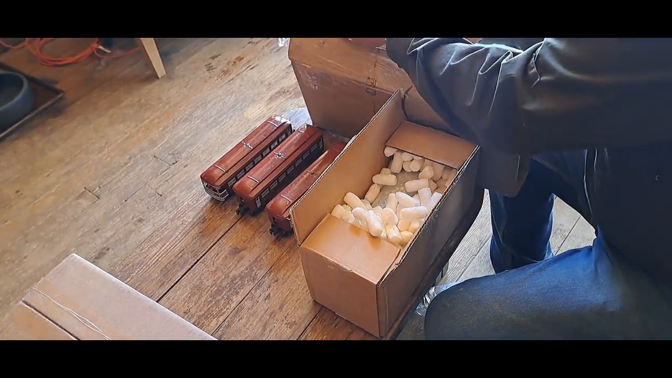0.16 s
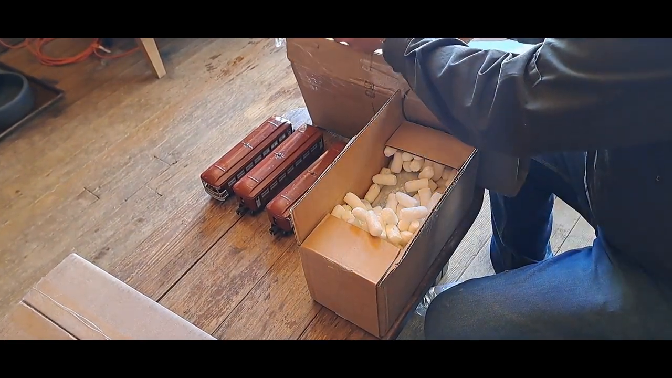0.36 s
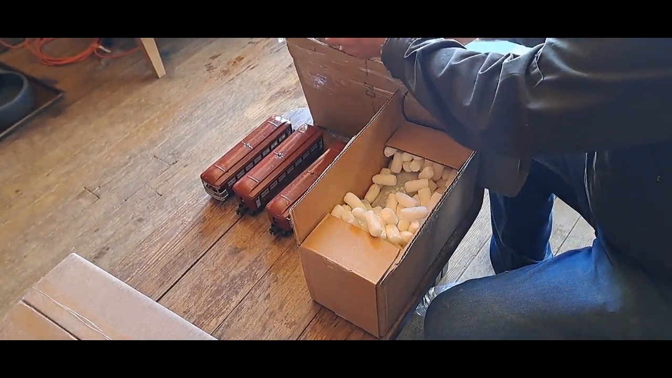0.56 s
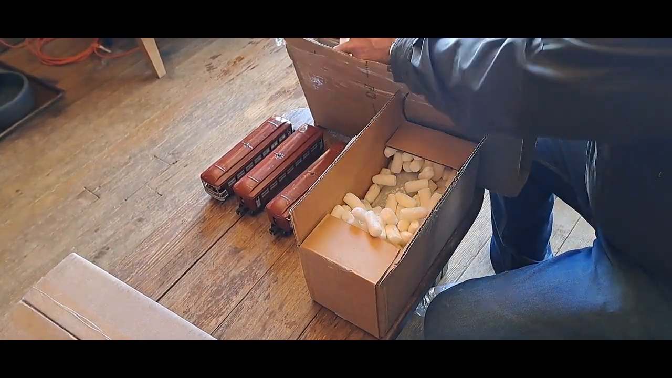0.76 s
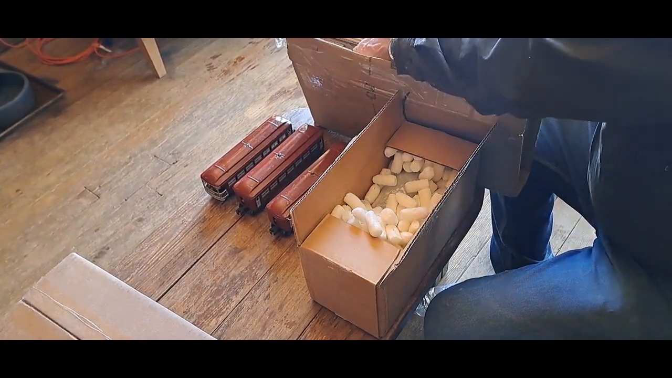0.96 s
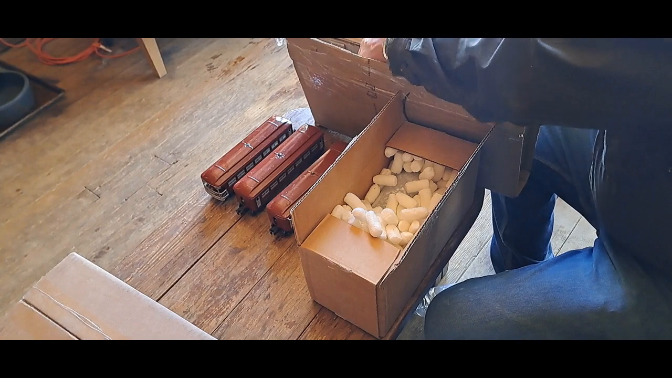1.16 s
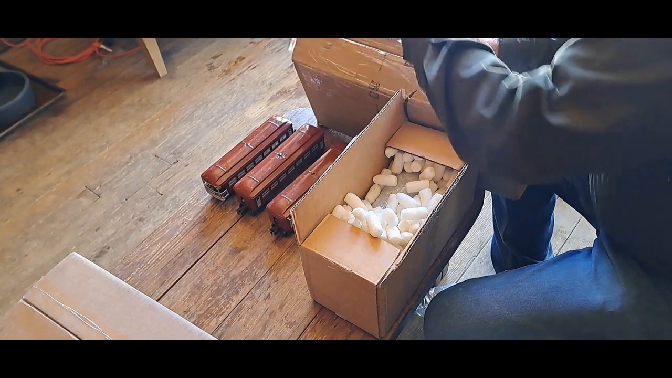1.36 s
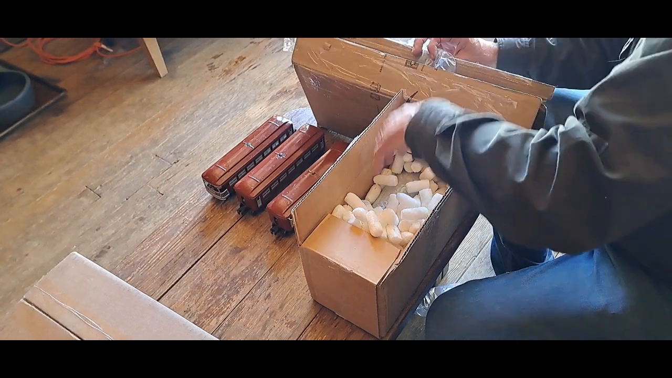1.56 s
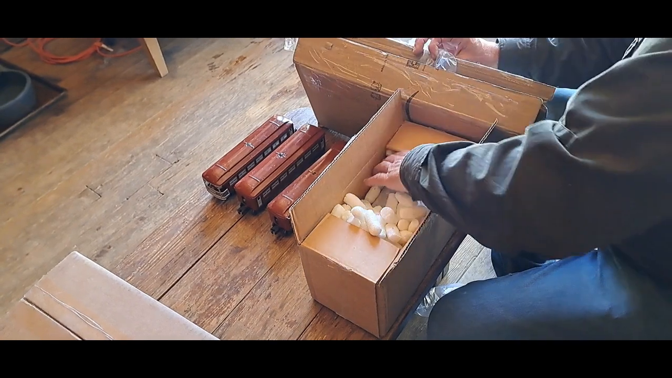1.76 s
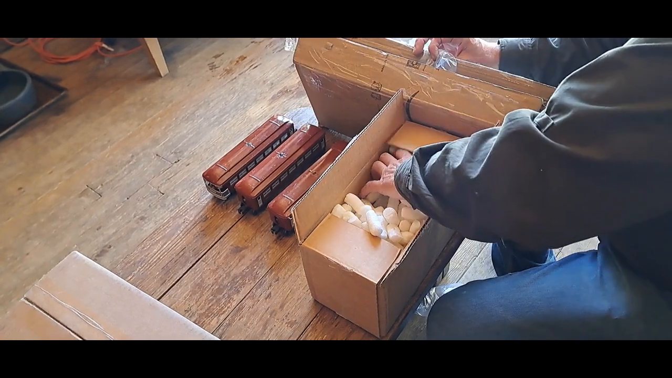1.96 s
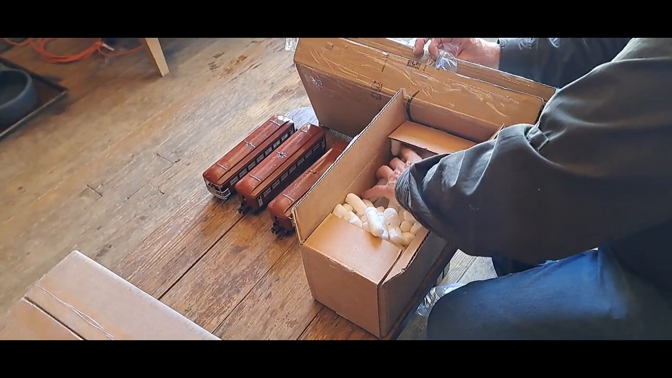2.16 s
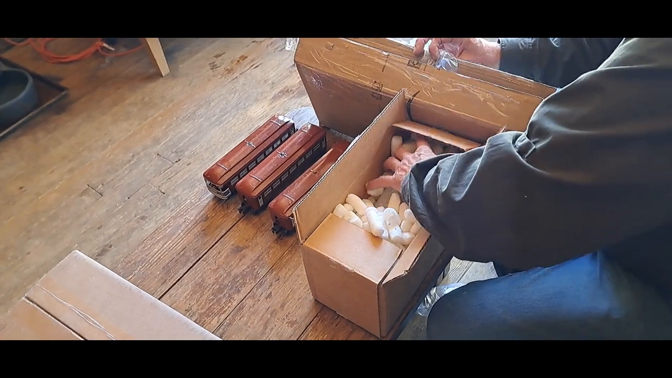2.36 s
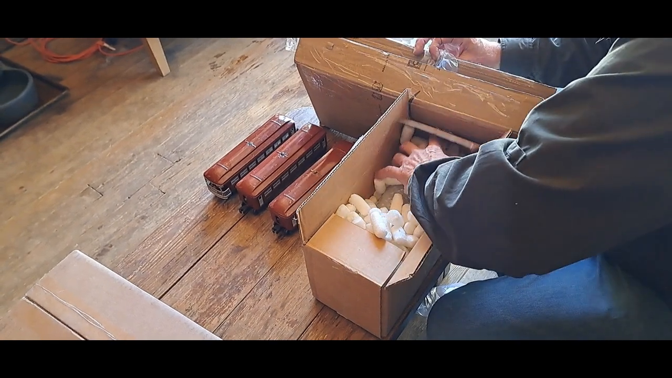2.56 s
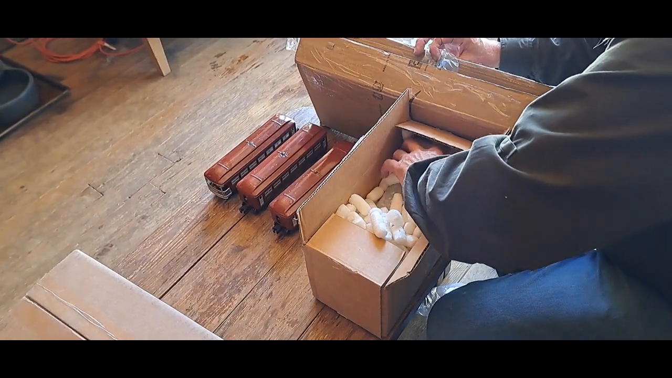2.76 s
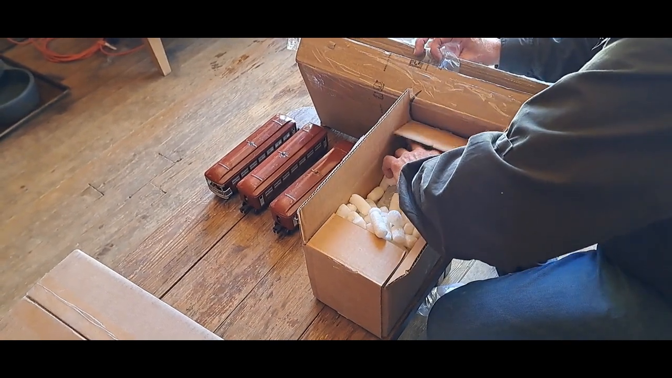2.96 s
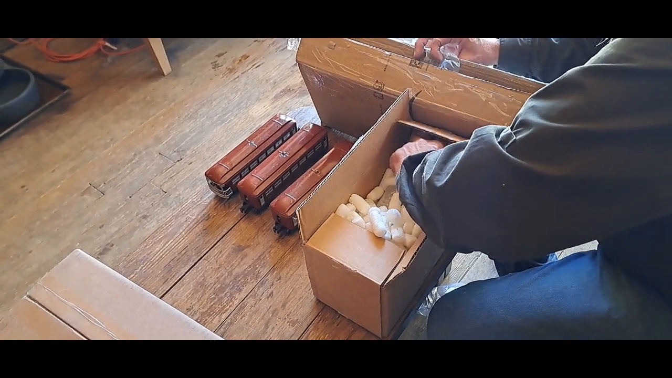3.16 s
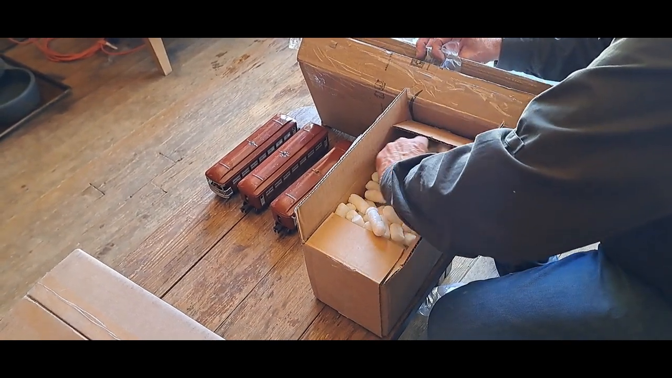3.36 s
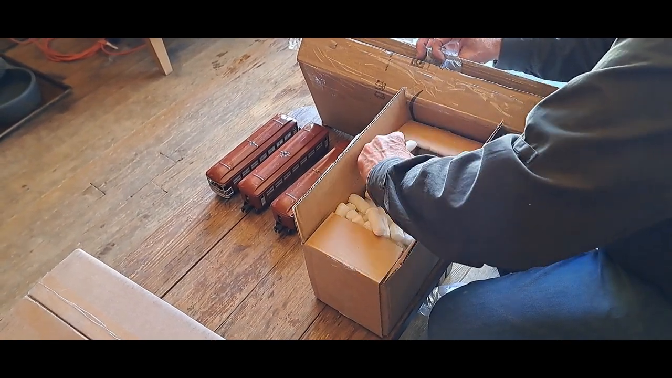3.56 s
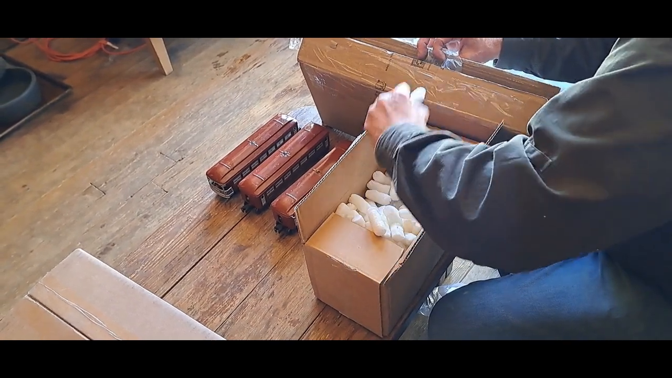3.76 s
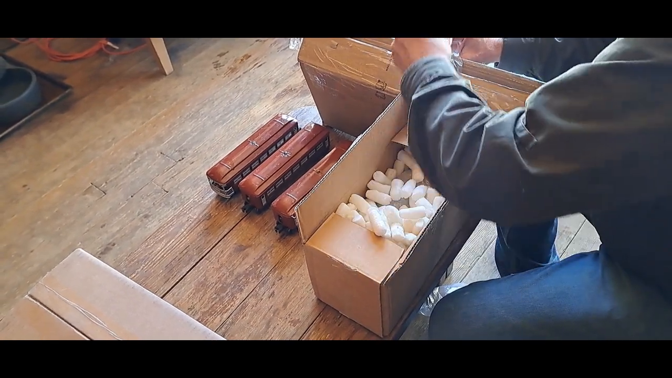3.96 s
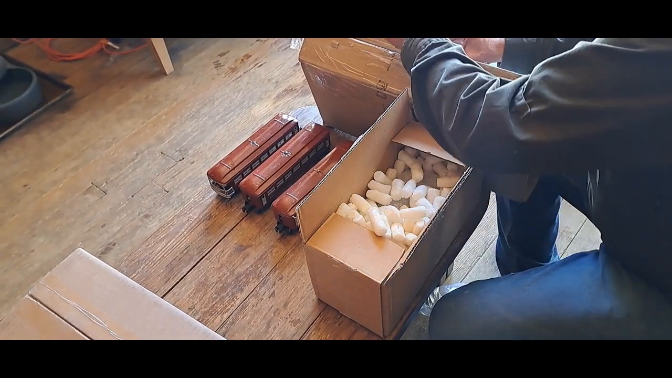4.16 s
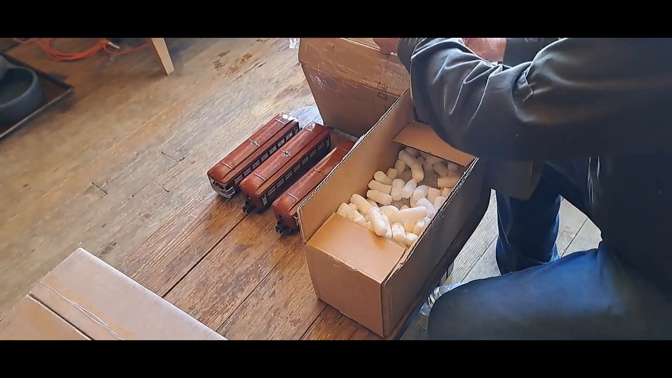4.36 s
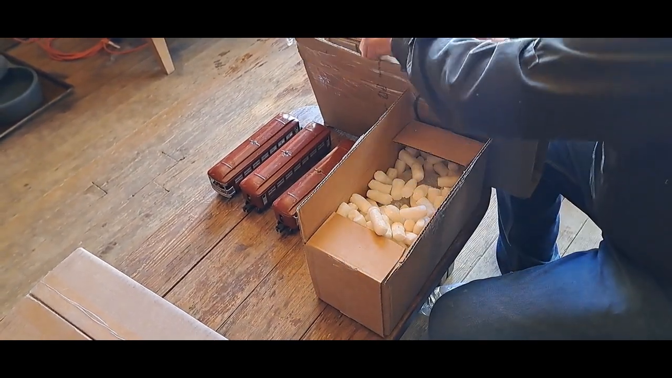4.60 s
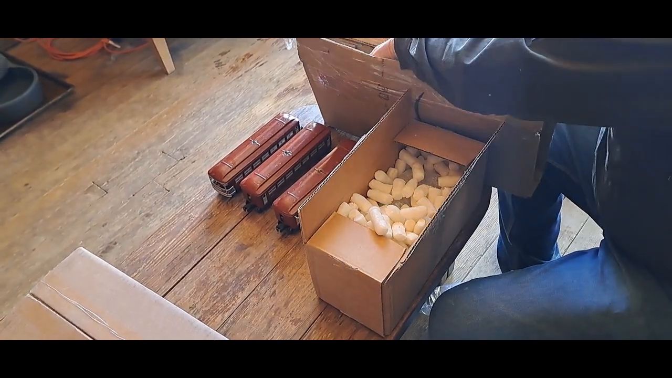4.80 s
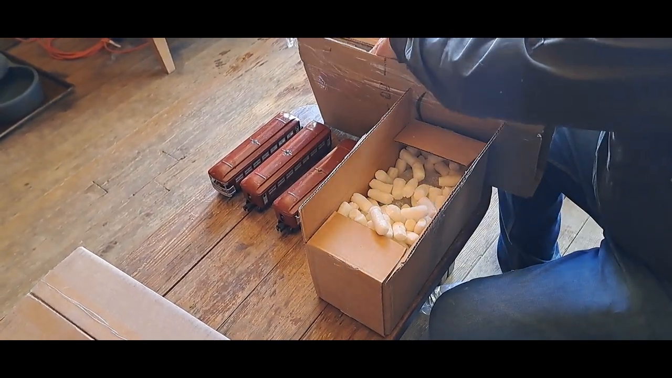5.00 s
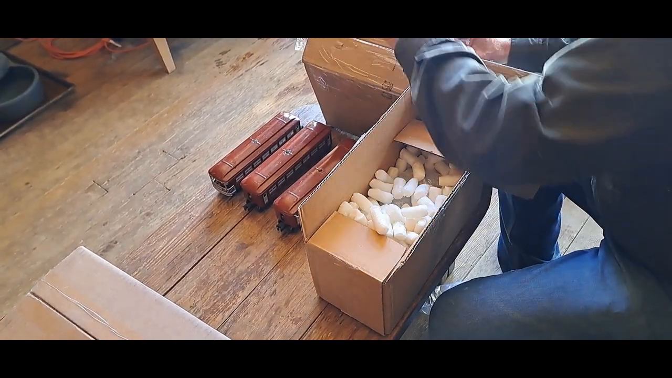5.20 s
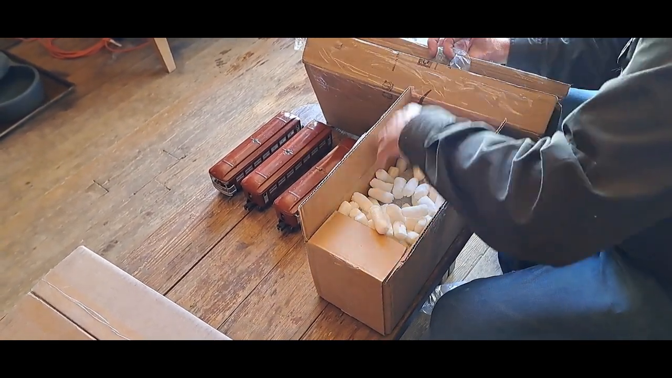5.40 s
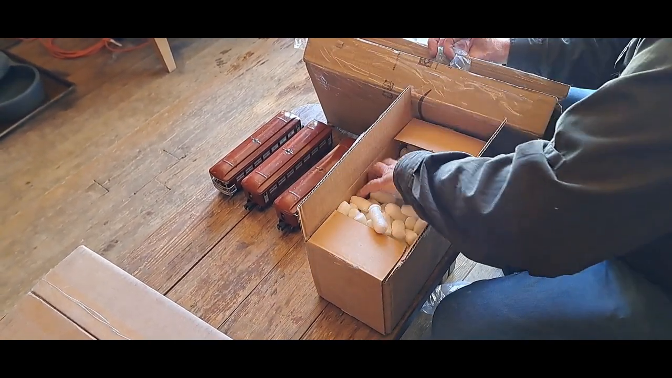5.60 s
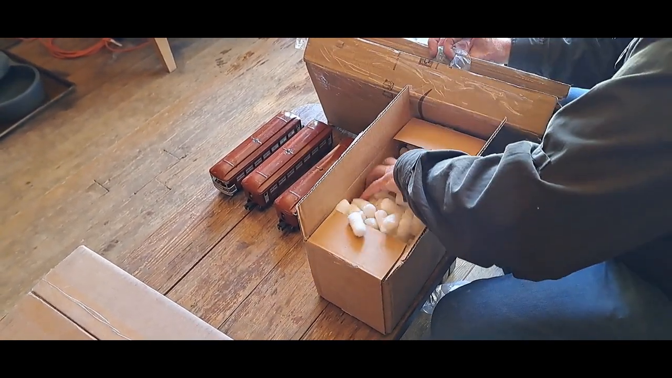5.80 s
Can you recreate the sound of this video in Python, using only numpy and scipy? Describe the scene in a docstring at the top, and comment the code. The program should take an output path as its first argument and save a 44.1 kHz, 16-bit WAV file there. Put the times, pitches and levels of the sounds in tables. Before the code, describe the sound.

In a small quiet room, someone searches a cardboard box full of foam peanuts, heard from nearby. Short dry rustles and a few sharp cracks lead into a longer spell of stirring and crunching, with hands knocking dully on the box. After a brief lull, more handfuls shift and tumble, and the cardboard takes a few more hollow bumps.

```python
"""Digging through foam packing peanuts

Hands stir loose foam peanuts in cardboard boxes on a wooden floor. Friction between the peanuts hisses,
their cells buckle with a crunch or a snap, and their impacts excite the low modes of the box walls.
Hands bump the boxes, the cardboard cracks, and pushes drive a thump from the floor.
A small room adds its reverberation and a faint steady tone of its own."""
import sys
import numpy as np
from scipy import signal
from scipy.fft import rfft, irfft, next_fast_len
from scipy.io import wavfile

SR = 44100
rng = np.random.default_rng(int(sys.argv[2]) if len(sys.argv) > 2 else 0)


def master_out(mix):
    """Clip the mix to full scale and print it as 16-bit PCM to the path in sys.argv[1]."""
    frames = np.transpose(np.atleast_2d(mix))
    ceiling = np.clip(frames, -1, 1)
    pcm = np.round(ceiling * 32767).astype(np.int16)
    wavfile.write(sys.argv[1], SR, pcm)


N = 257544

# hand strokes: (peak time [s], rise [s], fall [s], hiss [dB], hiss brightness [dB], crunch [dB],
# patter [dB])
HAND_STROKES = [(0.03, 0.22, 0.28, -76, 10, -69, -56), (0.115, 0.021, 0.087, -48, -2, -43.5, -44.5),
                (0.19, 0.12, 0.13, -71.5, 3, -65.5, -64.5), (0.40, 0.18, 0.2, -69.5, 4, -67, -74),
                (0.51, .1, 0.14, -88, 1, -76, -66), (0.60, 0.1, .1, -57.5, 0, -64, -66),
                (0.67, 0.18, 0.13, -64, -2, -63, -55), (0.74, .08, .1, -64.5, 4, -69, -77),
                (0.804, 0.12, 0.11, -60, 8, -62, -58.5), (0.87, .1, 0.093, -67.5, -3, -67, -79),
                (0.974, .12, 0.29, -55.5, -3.5, -60, -60), (1.02, 0.055, 0.054, -71, -7, -65, -51),
                (1.055, 0.0033, 0.11, -41.5, 3, -43.5, -49), (1.14, 0.13, 0.13, -61, -10, -47, -44.5),
                (1.236, 0.077, 0.054, -65, -9, -68, -42.5), (1.32, 0.14, 0.14, -61.5, 12, -60, -58),
                (1.366, 0.05, 0.08, -59.5, 6, -61, -43.5), (1.41, 0.053, 0.14, -66.5, -10, -60, -60),
                (1.49, .1, .12, -64.5, -10, -68, -63), (1.6, 0.18, 0.33, -80, 4, -69.5, -80),
                (1.755, 0.021, 0.23, -57.5, 2, -50.5, -58), (1.82, 0.052, 0.22, -53, -5, -66, -43.5),
                (1.875, 0.052, 0.084, -45, 0.5, -41, -49), (1.925, .06, .1, -48.5, -4, -61, -44),
                (1.98, .1, 0.1, -48, -3, -55, -45), (2.088, 0.058, 0.16, -48.5, -8.5, -47.5, -42.5),
                (2.15, 0.031, .1, -58, 1, -62, -61), (2.201, 0.023, 0.1, -49, -5.5, -54, -53),
                (2.315, 0.071, 0.13, -56.5, 2, -58.5, -45), (2.401, 0.085, 0.1, -49.5, -1, -52.5, -56),
                (2.47, 0.021, 0.18, -53, 0, -57.5, -51), (2.53, 0.039, 0.11, -53, 3.5, -69, -63),
                (2.58, 0.13, 0.07, -49, 2, -54, -46.5), (2.695, 0.19, 0.15, -53.5, -2, -60, -47),
                (2.77, 0.2, 0.11, -56, -6, -58, -49), (2.85, .1, .1, -53.5, -7.5, -54, -56),
                (2.94, 0.17, 0.17, -55.5, -1.5, -53, -55), (3.004, 0.036, 0.099, -63, -13, -49.5, -50),
                (3.14, 0.61, 0.34, -55.5, -5.5, -58.5, -53.5), (3.22, .2, 0.42, -57, -3, -55.5, -63),
                (3.29, 0.11, 0.11, -53.5, -7, -53, -68), (3.35, 0.062, 0.18, -51, -2.5, -52, -53.5),
                (3.44, .1, 0.064, -61, -9, -67, -52), (3.59, .15, 0.11, -58.5, -3.5, -70, -59),
                (3.66, 0.1, 0.089, -73, 9, -72, -61), (3.80, 0.088, 0.15, -66.5, -2, -103, -99),
                (4.07, 0.16, 0.29, -77.5, -2, -69, -89), (4.2, 0.27, .2, -68.5, -10, -85, -94),
                (4.295, 0.11, 0.14, -64, -8, -80, -95), (4.4, 0.17, .15, -72.5, -10, -68, -81),
                (4.52, 0.16, 0.13, -65, -2.5, -62.5, -63.5), (4.64, 0.14, .1, -70, 1, -80, -86),
                (4.73, 0.13, 0.27, -65.5, 5, -66, -78), (4.78, 0.07, 0.13, -53.5, -7, -64.5, -65.5),
                (4.829, 0.04, 0.097, -50, -1, -57.5, -48), (4.9, 0.11, .1, -64, 9.5, -64, -46.5),
                (4.976, .12, 0.13, -53, 4, -47.5, -45.5), (5.11, 0.055, .1, -63, 2, -71, -70),
                (5.203, .1, 0.088, -58.5, 8.5, -56, -46), (5.27, 0.087, 0.16, -72, -5, -65.5, -60),
                (5.43, 0.14, 0.11, -83, -5, -78, -63.5), (5.558, 0.013, 0.3, -63.5, 0, -53.5, -45.5),
                (5.647, 0.055, .2, -50, 3, -51.5, -46.5), (5.70, .06, 0.21, -62, -10, -58.5, -62),
                (5.76, 0.12, .2, -56, -6, -69, -53.5)]
# foam sliding on foam: (frequency [Hz], relative spectral density [dB])
HISS_SPECTRUM = [(2180, -12), (3700, -3.5), (4830, -2), (5110, -6), (6870, -8), (7860, -4.5), (9090, -12.5),
                 (10400, -9), (12100, -3), (15100, -11), (15800, -12)]
# hollow foam favours two bands: (frequency [Hz], relative spectral density [dB])
CRUNCH_SPECTRUM = [(410, -14), (700, 2), (950, -1), (1120, -0.5), (1300, -5), (1550, -5.5), (1850, -8),
                   (2130, -4.5), (2400, -5.5), (2750, -5.5), (3500, -14), (5000, -13.5), (6500, -16),
                   (11000, -79)]
# modes of the box walls and the air inside: (frequency [Hz], level [dB], t60 [s])
BOX_MODES = [(135, -32, 0.049), (181.7, -2, 0.089), (225.7, 3.5, 0.096), (281.4, -4, 0.093),
             (356.7, 1.5, 0.079), (426, 0.5, 0.03), (558, 0.5, 0.036), (630, -2, 0.049), (759, -6, 0.069),
             (931, -8.5, 0.028), (1160, -2, 0.011)]
# foam giving way: (time [s], level [dB], pitch [Hz], treble level [dB], t60 [s])
FOAM_SNAPS = [(0.025, -50, 1090, -62, 0.14), (0.1115, -25, 1280, -47, 0.037), (0.572, -59, 2030, -52, 0.17),
              (0.9921, -43, 935, -54, 0.039), (1.0513, -23, 2030, -46, 0.021), (1.075, -48, 620, -60, 0.31),
              (1.136, -27, 950, -54, 0.019), (1.226, -36.5, 910, -62, 0.054),
              (1.3911, -35, 1100, -52, 0.03), (1.4705, -50, 2250, -52, 0.044),
              (1.75, -55, 1030, -56, 0.047), (1.7715, -38, 1010, -44, 0.088),
              (1.8664, -26, 2660, -37, 0.052), (1.8746, -39, 2610, -32, 0.1), (1.97, -46, 7900, -65, 0.12),
              (2.0655, -41, 1110, -40, 0.056), (2.0842, -37, 1080, -47, 0.1),
              (2.1958, -42, 5200, -44, 0.082), (2.42, -47, 644, -65, 0.28), (2.463, -62, 1110, -41, 0.06),
              (2.54, -47, 5000, -55, 0.22), (2.684, -43, 5130, -40.5, 0.11),
              (2.9973, -34, 1710, -50, 0.028), (3.55, -52, 1283, -60, 0.14),
              (3.5767, -55, 1280, -60, 0.069), (3.575, -49.5, 762, -69.5, 0.085),
              (3.6398, -56, 1390, -54, 0.082), (3.7595, -72, 2080, -73, 0.19),
              (4.9396, -39.5, 1110, -58, 0.11), (4.9712, -44, 1090, -61, 0.15),
              (5.239, -38.5, 1120, -60, 0.032), (5.5483, -51, 1150, -58, 0.041),
              (5.616, -53, 1130, -33.5, 0.047)]
# blows on the cardboard: (time [s], peak level [dB], wall pitch [Hz], t60 [s])
BOX_BUMPS = [(0.114, -37.5, 268, 0.082), (0.399, -52.5, 283, 0.065), (0.46, -46.5, 187, 0.053),
             (0.514, -50, 264, 0.052), (0.632, -42, 332, 0.1), (0.763, -53, 295, 0.047),
             (0.959, -45, 369, 0.14), (1.015, -40, 333, 0.035), (1.049, -33, 208, 0.029),
             (1.118, -37, 354, 0.047), (1.135, -31, 353, 0.058), (1.221, -39, 293, 0.092),
             (1.229, -55.5, 237, 0.094), (1.35, -30, 192, 0.064), (1.365, -30, 232, 0.022),
             (1.475, -42, 253, 0.053), (1.496, -44, 322, 0.036), (1.538, -53.5, 298, 0.047),
             (1.752, -42, 222, 0.14), (1.864, -41, 204, 0.073), (2.078, -50, 234, 0.14),
             (2.312, -30.5, 239, 0.12), (2.57, -40.5, 230, 0.1), (2.658, -44, 175, 0.28),
             (2.827, -47, 196, 0.093), (2.884, -41, 316, 0.093), (2.95, -37.5, 246, 0.15),
             (3.002, -32.5, 186, 0.028), (3.282, -38, 248, 0.17), (3.35, -40, 224, 0.16),
             (3.688, -54, 316, 0.053), (3.951, -65, 201, 0.14), (4.068, -61, 199, 0.16),
             (4.471, -51, 307, 0.12), (4.718, -55, 227, 0.089), (4.818, -38, 342, 0.16),
             (4.934, -36.5, 600, 0.14), (5.1, -45, 330, 0.059), (5.182, -41.5, 217, 0.18),
             (5.549, -29, 327, 0.033), (5.571, -27.5, 178, 0.084), (5.597, -35, 259, 0.24),
             (5.605, -37.5, 131, 0.11), (5.745, -43, 304, 0.1)]
# dry cracks of the cardboard: (time [s], ring level [dB], pitch [Hz], tick level [dB])
CARDBOARD_CRACKS = [(0.111, -33, 1090, -47), (1.052, -24, 1900, -29), (1.751, -34, 1080, -41),
                    (1.868, -32, 2220, -33), (2.067, -29, 1080, -35), (3.001, -35, 1660, -43),
                    (5.547, -50, 826, -51)]
# pushes that reach the floor: (time [s], level [dB])
FLOOR_PUSHES = [(0.116, -59), (0.188, -59), (0.44, -59), (0.974, -49.5), (1.06, -53), (1.11, -49),
                (1.165, -43), (1.37, -53), (1.5, -66), (1.79, -54), (1.9, -49.5), (2.07, -68), (2.32, -57),
                (2.36, -55), (2.4, -61), (2.68, -62), (2.79, -69), (3.02, -58), (3.07, -67), (3.6, -51.5),
                (3.64, -64), (4.73, -67), (4.855, -41), (4.99, -58), (5.21, -68), (5.27, -64), (5.6, -52),
                (5.68, -75)]
# likeness of left and right: (frequency [Hz], coherence [0 to 1])
COHERENCE = [(60, 1), (110, 0.89), (200, 1), (380, 0.85), (700, 0.5), (1290, 0.044), (2380, 0.54),
             (4400, 0.023), (8120, 0.95), (15000, 0.74)]
# balance of the channels: (frequency [Hz], left minus right [dB])
BALANCE = [(60, -2.5), (130, 3.5), (290, 0.5), (640, -1), (1410, 0), (3100, -1.5), (6820, -1.5),
           (15000, -5.5)]
# room tone: (frequency [Hz], relative spectral density [dB])
ROOM_TONE_SPECTRUM = [(18, -53), (30, -29), (106, 7), (226, -30), (1150, -2.5), (1530, -47), (2100, 7),
                      (3540, -76), (4370, -2.5), (12200, -2.5), (15800, -37)]

HISS_SPLIT_HZ, CRUNCH_SPLIT_HZ, PATTER_SPLIT_HZ = 9530, 1756, 311
SWELL_DB, SWELL_ROUNDING = 20, 1.133   # rounding over 1: round tops, steep feet
ROOM_T60_S, EARLY_T60_S, REVERB_DB = 0.25, 0.067, -11.5


def rustle():
    """Each hand stroke drives friction, buckling and impact together; their sounds superpose."""
    times, rise, fall, hiss_peak, brightness, crunch_peak, patter_peak = np.transpose(HAND_STROKES)
    hiss_db, treble_db, crunch_db, patter_db = (
        swells(times, rise, fall, peak_db, rest_db=-95)
        for peak_db in (hiss_peak, hiss_peak + brightness, crunch_peak, patter_peak))
    crisp_db = -4 + 0.77 * (hiss_db - crunch_db)      # crisper where hiss outweighs crunch
    light_db = 1.5 + 0.44 * (crunch_db - patter_db)   # lighter where crunch outweighs patter
    return hiss(hiss_db, treble_db - hiss_db) + crunch(crunch_db, crisp_db) + patter(patter_db, light_db)


def hiss(level_db, bright_db):
    """Sliding friction: dry foam skins slip on each other, each stroke with its own brightness."""
    slips = grains(per_s=14000, uneven_db=1.6, clump_db=1.13, clump_hz=30)
    return tilt(colour(slips, HISS_SPECTRUM), HISS_SPLIT_HZ, level_db, bright_db)


def crunch(level_db, crisp_db):
    """Buckling: foam cells collapse under the fingers, each emitting an impulse."""
    collapses = grains(per_s=2500, uneven_db=0.64, clump_db=1.4, clump_hz=28)
    return tilt(colour(collapses, CRUNCH_SPECTRUM), CRUNCH_SPLIT_HZ, level_db, crisp_db)


def patter(level_db, light_db):
    """Impact excitation: peanuts tumble against the walls, each mode struck by its own share of them."""
    taps = grains(per_s=2700, uneven_db=2.58, clump_db=1.63, clump_hz=22)
    struck_mode = rng.integers(0, len(BOX_MODES), N)
    modes = sum(from_db(db) * rms_one(ring(taps * (struck_mode == k), hz, t60))
                for k, (hz, db, t60) in enumerate(BOX_MODES))
    return tilt(modes, PATTER_SPLIT_HZ, level_db, light_db)


def foam_snaps():
    """Transient resonance: a peanut gives way in decaying noise about its pitch, with a bright spray."""
    out, t = np.zeros(N + SR), np.arange(SR // 4) / SR
    for time, db, hz, treble_db, t60 in FOAM_SNAPS:
        ring_t60 = 7.6 / hz   # 7.6 cycles
        body = rms_one(ring(ring(rng.standard_normal(len(t)), hz, ring_t60), hz, ring_t60))
        spray = butterworth(rng.standard_normal(len(t)), 4500, "high", order=2)
        envelope = from_db(-60 * t / t60) * (1 - np.exp(-t / 0.0023))
        add_at(out, time, (from_db(db) * body + from_db(treble_db) * spray) * envelope)
    return out[:N]


def box_bumps():
    """Modal response: a soft blow rings the wall it hits, and most strongly the modes near that pitch."""
    out, t = np.zeros(N + SR), np.arange(SR // 4) / SR
    mode_hz, mode_db, mode_t60 = np.transpose(BOX_MODES)[:, :, None]
    attack = 1 - np.exp(-t / 0.0033)
    for time, db, wall_hz, t60 in BOX_BUMPS:
        octaves_away = np.abs(np.log2(mode_hz / wall_hz))
        excited_db = mode_db + rng.normal(0, 5.5, mode_db.shape) - 21.8 * octaves_away
        ring_t60 = t60 * mode_t60 / mode_t60.max()
        modes = from_db(excited_db - 60 * t / ring_t60) * np.sin(2 * np.pi * mode_hz * t)
        wall = from_db(3.5 - 60 * t / t60) * np.sin(2 * np.pi * wall_hz * t)
        blow = (wall + modes.sum(axis=0)) * attack
        add_at(out, time, from_db(db) * blow / np.abs(blow).max())
    return butterworth(out[:N], 113, "high", order=4)   # the blows carry little sound below about 113 Hz


def cardboard_cracks():
    """Sudden release of stress: a few cycles of free vibration under a short broadband tick."""
    out, t = np.zeros(N + SR), np.arange(SR // 20) / SR
    t60_cycles, tick_t60 = 13, 0.0063
    for time, db, hz, tick_db in CARDBOARD_CRACKS:
        knock = from_db(db - 60 * t * hz / t60_cycles) * np.sin(2 * np.pi * hz * t)
        tick = from_db(tick_db - 60 * t / tick_t60) * rng.standard_normal(len(t))
        add_at(out, time, knock + tick)
    return out[:N]


def floor_thumps():
    """Forced vibration: the floorboards answer the pushes in one low, narrow mode."""
    times, push_db = np.transpose(FLOOR_PUSHES)
    level_db = swells(times, rise=0.047, fall=0.032, peak_db=push_db, rest_db=-89.5)
    mode_hz, stage_bandwidth_hz = 62, 32
    t60 = np.log(1000) / (np.pi * stage_bandwidth_hz)
    boards = ring(ring(rng.standard_normal(N), mode_hz, t60), mode_hz, t60)
    return from_db(level_db) * rms_one(boards)


def room(direct, scattered):
    """Reverberation: reflections differ at two microphones, so coherence and balance vary with pitch."""
    t, size = np.arange(SR // 2) / SR, next_fast_len(N + SR // 2)
    decays = from_db(-60 * t / [[ROOM_T60_S], [ROOM_T60_S], [EARLY_T60_S]])
    echoes = rng.standard_normal(decays.shape) * decays
    echoes /= np.linalg.norm(echoes, axis=1, keepdims=True)
    late_mid, late_side, early = rfft(echoes, size)
    mid = rfft(direct, size) * (1 + from_db(REVERB_DB) * late_mid)
    side = rfft(scattered, size) * (early + from_db(REVERB_DB) * late_side)
    coherence = np.clip(at_bins(COHERENCE, size), 0, 1)
    mid *= np.sqrt((1 + coherence) / 2)
    side *= np.sqrt((1 - coherence) / 2)
    lean = from_db(at_bins(BALANCE, size) / 2)
    return irfft(np.array([(mid + side) * lean, (mid - side) / lean]), size)[:, :N]


def room_tone():
    """Stationary noise: the faint background of the room."""
    return from_db(-76.5) * colour(rng.standard_normal(N), ROOM_TONE_SPECTRUM)


def grains(per_s, uneven_db, clump_db, clump_hz):
    """Poisson process: impulses of uneven size, clumped by a slow drift in level."""
    sizes = from_db(uneven_db * np.minimum(rng.exponential(1, N), 5)) * rng.choice([-1, 1], N)
    occurs = rng.random(N) < per_s / SR
    return sizes * occurs * from_db(clump_db * drift(clump_hz))


def drift(hz):
    """Low-pass noise: a slow random fluctuation of unit rms."""
    pole = np.exp(-2 * np.pi * hz / SR)
    return rms_one(signal.lfilter([1], [1, -2 * pole, pole * pole], rng.standard_normal(N + SR))[SR:])


def swells(times, rise, fall, peak_db, rest_db):
    """Level in dB of swells adding in power; each is SWELL_DB down at its rise and fall times."""
    t = np.arange(0, N + 64, 64)[:, None] / SR
    distance = np.where(t < times, (times - t) / rise, (t - times) / fall)
    swell_db = peak_db - SWELL_DB * distance ** SWELL_ROUNDING
    power = np.sum(from_db(swell_db) ** 2, axis=1) + from_db(rest_db) ** 2
    return np.interp(np.arange(N) / SR, t[:, 0], 10 * np.log10(power))


def ring(force, hz, t60):
    """Damped oscillator: a unit impulse starts a decaying sine of unit amplitude."""
    r, w = from_db(-60 / (t60 * SR)), 2 * np.pi * hz / SR
    return signal.lfilter([0, np.sin(w)], [1, -2 * r * np.cos(w), r * r], force + 1e-18)


def tilt(x, hz, level_db, upper_db):
    """Crossover at hz: the lower band stands at level_db, the upper band upper_db above it."""
    low, high = (rms_one(butterworth(x, hz, kind, order=4)) for kind in ("low", "high"))
    return from_db(level_db) * (low + from_db(upper_db) * high)


def colour(x, spectrum):
    """Spectral shaping: a white signal takes on this spectrum, at unit rms."""
    size = next_fast_len(N)
    return rms_one(irfft(rfft(x, size) * from_db(at_bins(spectrum, size)), size)[:N])


def at_bins(table, size):
    """Interpolation in log frequency at the bins of a transform of this size."""
    bin_hz = np.maximum(np.arange(size // 2 + 1) * SR / size, 10)
    hz, values = np.transpose(table)
    return np.interp(np.log(bin_hz), np.log(hz), values)


def butterworth(x, hz, kind, order):
    return signal.sosfilt(signal.butter(order, hz, kind, fs=SR, output="sos"), x)


def add_at(out, time, sound):
    start = round(time * SR)
    out[start:start + len(sound)] += sound


def from_db(db):
    return 10 ** (np.asarray(db) / 20)


def rms_one(x):
    return x / np.sqrt(np.mean(x ** 2) + 1e-20)


def scene():
    """Superposition: rustle, blows and room tone add and are heard through the room."""
    blows = floor_thumps() + box_bumps() + foam_snaps() + cardboard_cracks()
    direct = room_tone() + rustle() + blows
    # peanuts lie all over the box: independent grains make up what differs between the channels
    scattered = room_tone() + rustle() + blows
    return room(direct, scattered)


def record(dry):
    """Band limiting: the small microphones lose the deep bass, and the top is cut steeply."""
    thin = butterworth(dry, 47.6, "high", order=6)
    return signal.sosfilt(signal.ellip(12, 0.5, 80, 15800, fs=SR, output="sos"), thin)


dry = scene()
out = record(dry)
master_out(out)
```